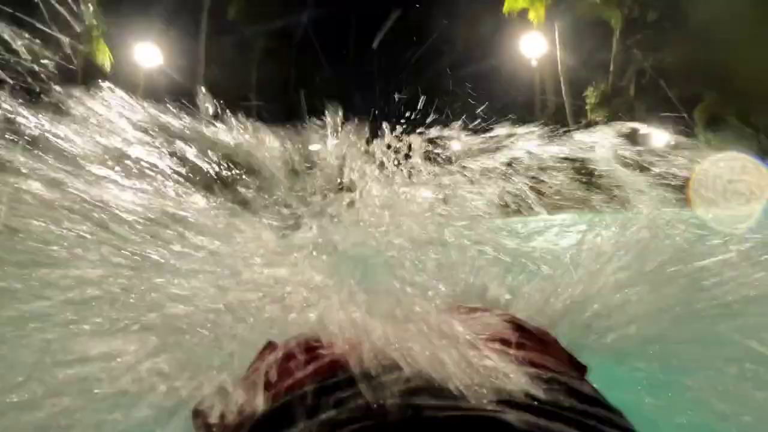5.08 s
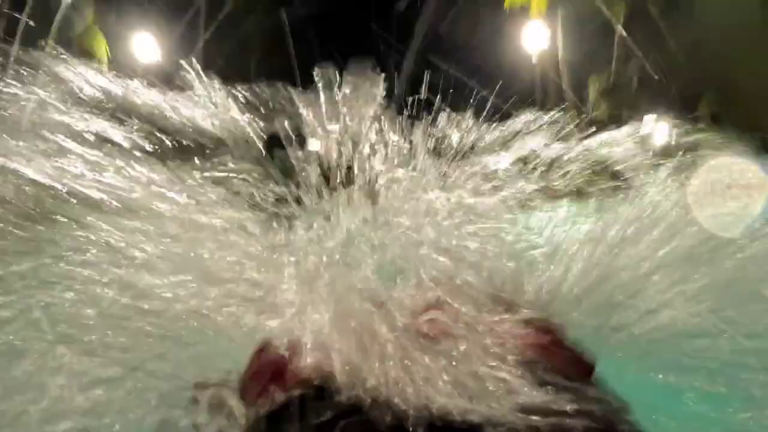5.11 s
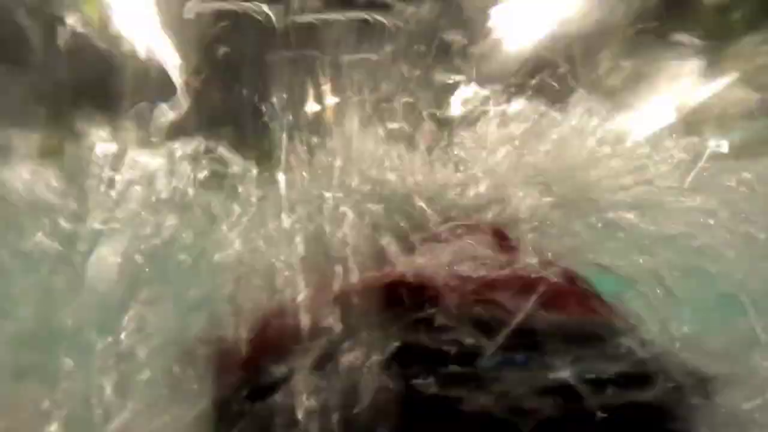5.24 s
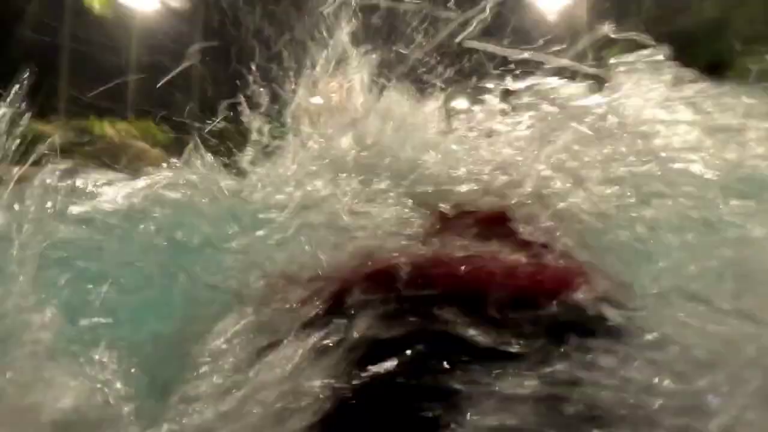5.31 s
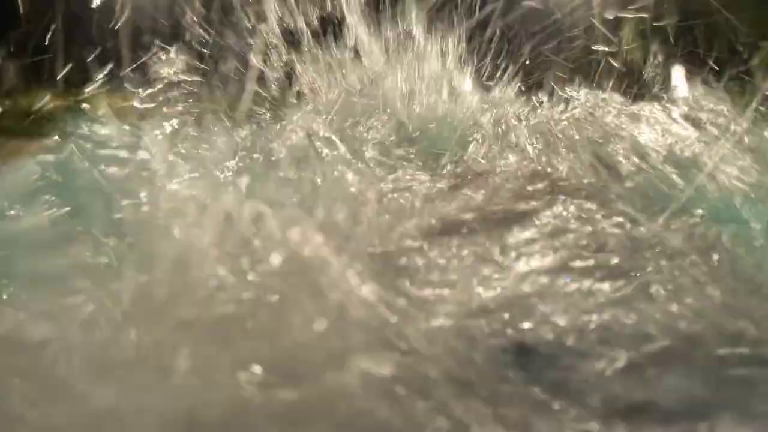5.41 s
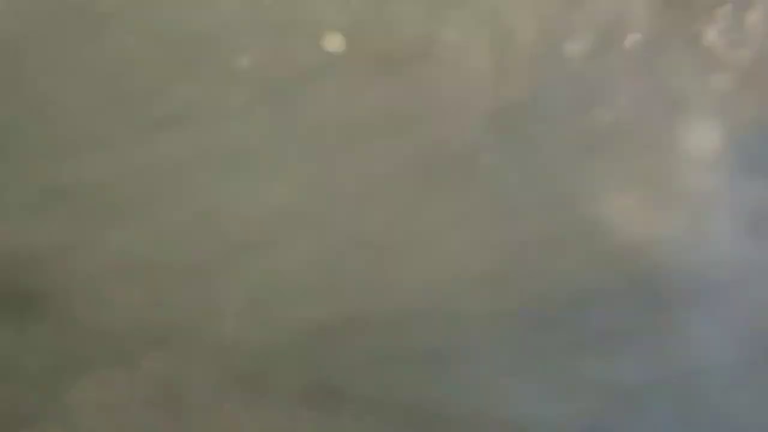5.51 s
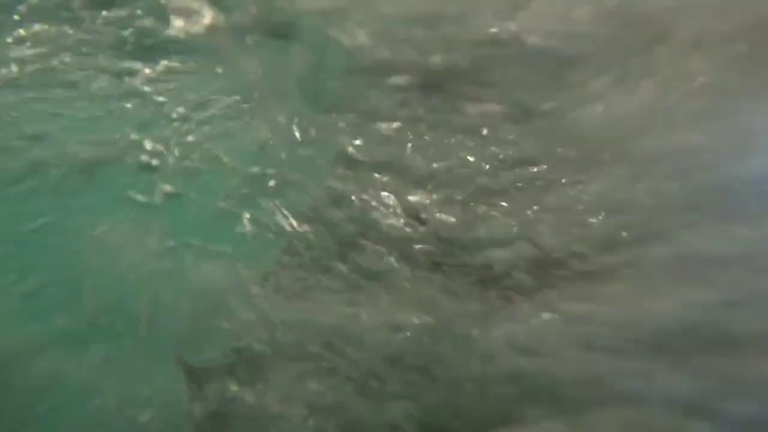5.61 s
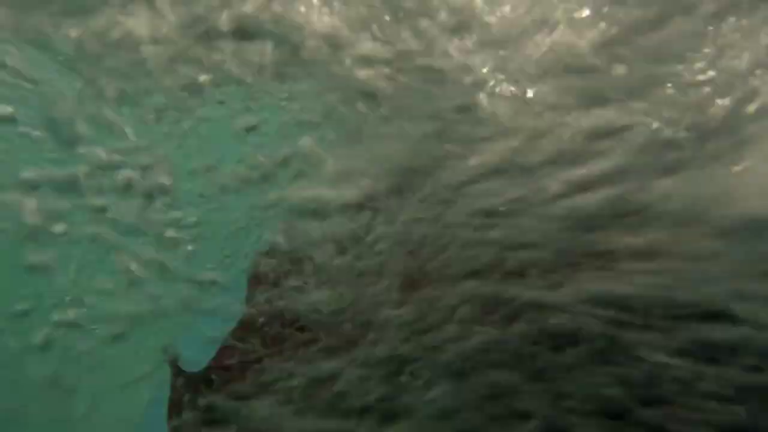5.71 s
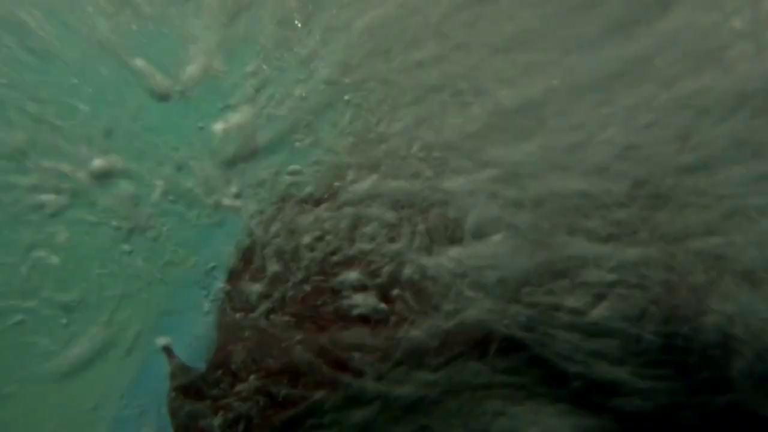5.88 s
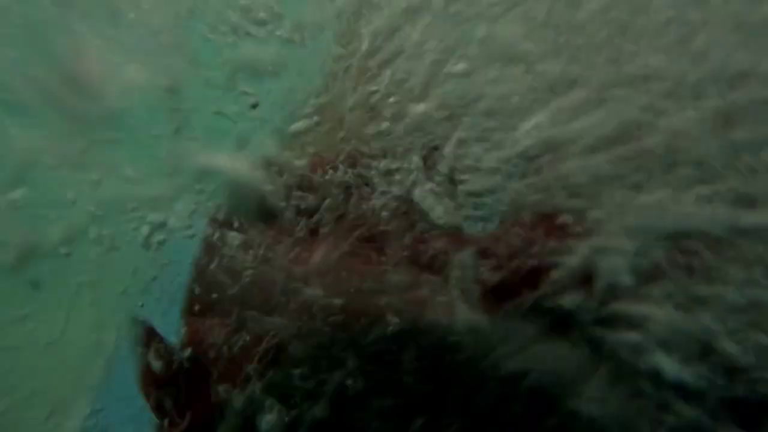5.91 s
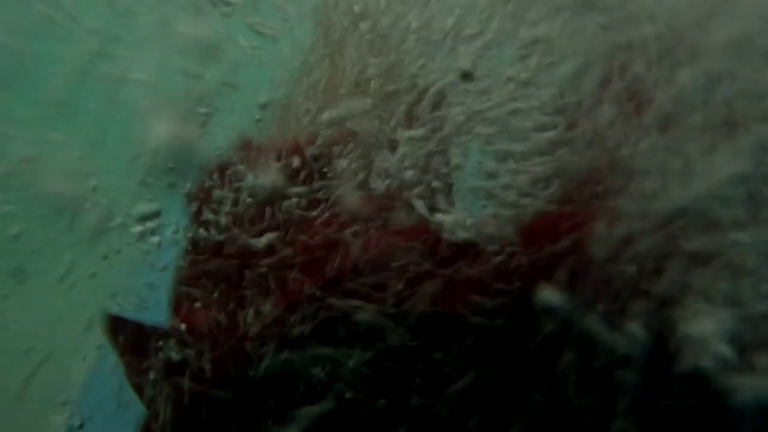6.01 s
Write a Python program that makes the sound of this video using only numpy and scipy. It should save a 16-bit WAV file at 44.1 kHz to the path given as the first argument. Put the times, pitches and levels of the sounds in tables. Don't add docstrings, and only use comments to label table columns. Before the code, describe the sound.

Heard from a camera riding along inside a dark water slide: deep uneven rumble and judder shake its housing, with hollow knocks and dull thuds at the tube joints and water hissing underneath. After about five seconds the water rushes up, spray slaps the housing hard and foam roars, overloading the microphone. Finally the treble vanishes as it sinks, leaving low wobbling bubbles.

```python
import sys
import numpy as np
from scipy import signal
from scipy.fft import rfft, irfft
from scipy.io import wavfile
from scipy.ndimage import uniform_filter1d

SR = 44100
rng = np.random.default_rng(int(sys.argv[2]) if len(sys.argv) > 2 else 0)


def convert_level_to_amplitude(level_db):
    exponent = np.asarray(level_db, float) / 20
    return 10 ** exponent


def waveform_to_disk(signal):
    frames = np.transpose(np.atleast_2d(signal))
    scaled = np.clip(frames, -1, 1) * 32767
    samples = np.round(scaled).astype(np.int16)
    wavfile.write(sys.argv[1], SR, samples)


N = 276507


def evened(x):
    return x / np.sqrt(np.mean(x ** 2) + 1e-20)


def smooth(x, span, axis=-1):
    return uniform_filter1d(uniform_filter1d(x, span, axis), span, axis)


def read(points, hz):
    f, value = np.transpose(points)
    return np.interp(np.log(hz + 1), np.log(f + 1), value)


def curve(rows, t):
    s, *columns = np.transpose(rows)
    return [np.interp(t, s, c) for c in columns]


def tents(rows, t):
    return np.array([np.maximum(1 - abs(t - row[0]) / row[1], 0) for row in rows])


def add(mix, s, sound, pan_db):
    part = mix[:, round(s * SR):][:, :len(sound)]
    part += convert_level_to_amplitude(np.array([[pan_db / 2], [-pan_db / 2]])) * sound[:part.shape[1]]


def band_noise(tone):
    hz = np.fft.rfftfreq(N, 1 / SR)
    return evened(irfft(rfft(rng.standard_normal(N)) * convert_level_to_amplitude(read(tone, hz)), N))


# (frequency [Hz], level [dB per Hz])
SHAKE_TONE = [(10, -3), (22, 6.5), (32, 1.5), (50, -9.5), (75, -37.5), (200, -89), (900, -140)]
JUDDER_TONE = [(30, -47.5), (55, 3), (90, -6.5), (130, -16), (220, -46), (800, -93.5), (3000, -140)]
SCRAPE_TONE = [(80, -29), (150, 3), (300, -4.5), (500, -9.5), (800, -12), (2000, -74), (6000, -130)]
# (time [s], half length [s], lift [dB])
SWAYS = [(0.119, 0.043, 9), (.55, 0.19, -2), (0.75, 0.1, 5.5), (0.916, 0.093, 7.5), (1.51, 0.34, 7.5),
         (1.837, 0.29, -6), (2.095, 0.071, 8.5), (2.276, 0.29, -2), (2.609, 0.14, 5.5), (2.939, 0.18, 1.5),
         (3.253, 0.087, 12.5), (3.406, 0.12, -9.5), (4.077, 0.28, 3.5), (4.61, 0.25, 9), (4.917, 0.15, 7),
         (5.168, 0.09, -5.5), (5.323, 0.14, 8.5), (5.647, 0.065, 3.5), (6.017, 0.2, -17), (6.27, 0.23, -21)]
# (time [s], half length [s], judder lift [dB], splash lift [dB])
RUBS = [(0.065, 0.24, 3, 2), (0.525, 0.045, 14.5, 3), (0.723, 0.17, 11.5, 9), (1.476, 0.21, 6, 2),
        (1.975, 0.089, 5.5, 3.5), (2.105, 0.11, 6, 0.5), (2.614, 0.22, 11.5, 3), (2.932, 0.082, 10.5, 2),
        (3.167, 0.2, 3.5, 4), (4.15, 0.28, 1, 0), (4.615, 0.34, 3.5, 1.5)]
# (time [s], drag [0-1])
DRAG = [
    (4.85, 0.47),
    (5.2, 0.4),
    (5.3, 0.89),
    (5.46, 0.79),
    (5.52, 0.77),
    (5.66, 0.96),
    (5.85, 0.95),
    (6.01, 0.79),
    (6.27, 0.4),
]
SHAKE_DB, JUDDER_DB, SCRAPE_DB = -24, -48.5, -65.5
JUDDER_DRAG_DB, SCRAPE_DRAG_DB = 23.5, 34
SCRAPE_PER_JUDDER, SCRAPE_PER_SPLASH = 0.49, 1


def tube():
    t = np.arange(N) / SR
    drag = curve(DRAG, t)[0]
    judder, splash = np.transpose(RUBS)[2:] @ tents(RUBS, t)
    shake_db = SHAKE_DB + np.transpose(SWAYS)[2] @ tents(SWAYS, t)
    judder_db = JUDDER_DB + judder + JUDDER_DRAG_DB * drag
    scrape_db = SCRAPE_DB + SCRAPE_PER_JUDDER * judder + SCRAPE_PER_SPLASH * splash
    scrape_db = scrape_db + SCRAPE_DRAG_DB * drag
    motion = np.zeros(N)
    for tone, level_db, span in ((SHAKE_TONE, shake_db, 5000), (JUDDER_TONE, judder_db, 2500),
                                 (SCRAPE_TONE, scrape_db, 2000)):
        x = band_noise(tone)
        x = evened(x / np.sqrt(smooth(x ** 2, span) + .05))
        motion += convert_level_to_amplitude(level_db) * x
    twist = convert_level_to_amplitude(-21.5) * band_noise(SHAKE_TONE) * convert_level_to_amplitude(shake_db)
    return motion + twist * np.array([[1], [-1]])


# (time [s], ring [dB], ring pitch [Hz], thump [dB], tick [dB])
KNOCKS = [(.127, -32, 580, -62, -34), (.131, -16, 515, -21.5, -24), (.503, -25.5, 637, -24, -24),
          (.526, -17.5, 610, -25.5, -54), (.565, -42, 404, -43, -60), (.628, -32.5, 746, -35, -45),
          (.691, -29, 432, -28, -31), (.81, -20.5, 560, -34, -40), (1.443, -29, 477, -33, -34),
          (1.568, -24, 482, -24.5, -27.5), (2.015, -21.5, 520, -34, -29.5), (2.109, -32, 467, -29.5, -32.5),
          (2.594, -32, 445, -30, -53), (2.641, -26.5, 423, -28, -28.5), (3.282, -26, 470, -25, -25),
          (4.38, -31.5, 450, -44, -41), (4.629, -28, 410, -20.5, -21.5), (4.639, -28, 521.7, -26, -61),
          (5.044, -52, 550, -26.5, -27), (5.242, -35, 395, -32.5, -35), (5.339, -31, 410, -22.5, -25),
          (5.389, -13, 534, -25, -19), (5.4303, -39, 590, -34, -18.5), (5.571, -17.5, 600, -27.5, -36),
          (5.789, -9.5, 480, -28, -32)]
# (time [s], thump [dB])
BUMPS = [(.395, -41.5), (0.59, -38), (0.67, -34), (0.765, -31), (0.977, -36), (1.099, -38), (1.629, -37),
         (1.719, -45), (1.903, -32), (1.935, -40), (1.947, -37), (1.963, -40), (2.028, -34), (2.076, -38),
         (2.168, -49), (2.318, -45), (2.449, -35.5), (2.489, -35.5), (2.513, -37), (2.663, -35),
         (2.683, -36), (2.929, -38.5), (3.334, -45), (3.542, -44), (4.347, -41), (5.3, -30), (4.682, -32.5),
         (4.758, -41), (4.853, -37.5), (4.674, -36), (4.869, -31.5), (5.174, -34.5)]
BUMP_HZ, BUMP_RING_DB, BUMP_TICK_DB = 450, -15, -7


def knocks():
    out, t = np.zeros((2, N)), np.arange(2500) / SR
    soften = signal.butter(8, 1950, fs=SR)
    rise = np.minimum(t / 0.003, 1)
    late = np.maximum(t - .0015, 0)
    blows = KNOCKS + [(s, db + BUMP_RING_DB, BUMP_HZ, db, db + BUMP_TICK_DB) for s, db in BUMPS]
    for (s, db, hz, thump_db, tick_db), (u, v) in zip(blows, rng.random((len(blows), 2))):
        tick = -np.cos(2 * np.pi * (1050 + 200 * v) * (t - .0012)) * np.exp(-((t - .0012) / 0.00047) ** 2)
        echo = .4 * np.sin(2 * np.pi * (900 + 700 * u) * t) * convert_level_to_amplitude(-60 * t / 0.02) * rise
        ring_cycles = 1.108 * hz * t * (1 - 12 * np.minimum(t, .015))
        ring = np.sin(2 * np.pi * ring_cycles) * convert_level_to_amplitude(-60 * t / 0.015) * rise
        thump_cycles = 112 * late + (410 + 60 * u) * 0.0029 * (1 - np.exp(-late / 0.0029))
        thump = -np.sin(2 * np.pi * thump_cycles) * convert_level_to_amplitude(-60 * late / 0.076)
        blow = convert_level_to_amplitude(tick_db + 9.0) * (tick + echo) + convert_level_to_amplitude(db + 12.0) * ring + convert_level_to_amplitude(thump_db + 4.0) * thump
        add(out, s, signal.lfilter(*soften, blow), 0)
    return out


# (time [s], peak [dB], pitch [Hz])
THUDS = [(0.584, -22.5, 170), (0.624, -21, 123), (0.685, -31, 126), (0.721, -25, 127), (1.094, -37, 127),
         (1.391, -24.5, 131.5), (1.446, -23, 127), (1.566, -26.5, 190.2), (1.719, -28.5, 129),
         (1.863, -36, 128), (1.937, -32, 125), (2.11, -24.5, 194), (2.443, -29, 126), (2.51, -24, 127),
         (2.639, -16.5, 135), (2.68, -24, 128), (2.922, -23, 128), (3.168, -30.5, 226), (3.28, -20.5, 195),
         (3.544, -25.5, 127), (3.773, -35, 126), (3.921, -38, 145), (4.135, -37, 127),
         (4.627, -18.5, 200.6), (4.672, -27, 125), (4.758, -27, 128), (5.2, -26.5, 127)]
THUD_RISE_S, THUD_T60_S, THUD_DB = .005, 0.076, 1.5


def thuds():
    out, t = np.zeros((2, N)), np.arange(4000) / SR
    rise = np.minimum(t / THUD_RISE_S, 1)
    for s, db, hz in THUDS:
        add(out, s, -convert_level_to_amplitude(db + THUD_DB - 60 * t / THUD_T60_S) * rise * np.sin(2 * np.pi * hz * t), 0)
    return out


def water(rows, bands, tone, same, lean, lead, patchy_db, flicker_db, grain_db, size):
    hop, hz = size // 4, np.fft.rfftfreq(size, 1 / SR)
    frames = N // hop + 5
    t = np.arange(frames) * hop / SR
    a, b, c, d, patches, drops = rng.standard_normal((frames, len(hz), 6)).T
    s, *levels = np.transpose(rows)
    colour = read(tone, hz)
    centres = [np.sqrt(lo * hi) for lo, hi in bands]
    field_db = colour[:, None] + 0 * t
    for k, (lo, hi) in enumerate(bands):
        inside = (hz > lo) & (hz <= hi)
        share_db = 10 * np.log10(np.sum(convert_level_to_amplitude(2 * colour)[inside]))
        weight = read(list(zip(centres, np.arange(len(bands)) == k)), hz)
        field_db += np.outer(weight, np.interp(t, s, levels[k]) - share_db)
    field_db += patchy_db * evened(uniform_filter1d(smooth_twice_free(patches, size // 64), 24, 1))
    field_db += flicker_db * evened(uniform_filter1d(smooth_twice_free(drops, size // 6), 3, 1))
    grains = evened(uniform_filter1d(smooth_twice_free(drops, 4), 3, 1))
    field_db += grain_db * np.maximum(grains - 1.5, 0)
    alike = np.clip(read(same, hz), 0, 1)[:, None]
    left = a + 1j * b
    right = alike * left + np.sqrt(1 - alike ** 2) * (c + 1j * d)
    right = right * np.exp(-1j * read(lead, hz))[:, None]
    tilt = convert_level_to_amplitude(read(lean, hz) / 2)[:, None]
    running = (t >= s[0]) & (t <= s[-1] + .015)
    z = np.array([left * tilt, right / tilt]) * convert_level_to_amplitude(field_db) * running
    return signal.istft(z, nperseg=size, noverlap=size - hop)[1][:, :N]


def smooth_twice_free(x, span):
    return uniform_filter1d(x, span, 0)


# (time [s], flow [dB])
FLOW = [(0, 1), (.05, 3.5), (.3, 1), (1.1, 1.3), (1.2, 4.5), (1.3, 1.5), (2.05, 1), (2.2, -2), (2.8, 1),
        (3.1, 0.3), (3.55, -2.5), (4.1, -0.1), (4.6, -0.5), (4.9, 3.5), (5.15, 12), (5.33, 15.5),
        (5.375, 20)]
# (calm [dB], per flow [dB/dB], per splash [dB/dB], wetting drift [dB/s])
RUSH_BANDS = [(-49.5, 0.79, 1.18, 0.63), (-51, 1.09, 0.48, -0.08), (-57, 1.19, 0.17, -0.32),
              (-76, 1.4, 0.34, -0.65)]
# (low edge [Hz], high edge [Hz])
RUSH_HZ = [(700, 2000), (2400, 5500), (5500, 8000), (8500, 12500)]
# (frequency [Hz], level [dB per Hz])
RUSH_TONE = [(150, -26.5), (400, -16), (930, -2), (1250, -6.5), (1580, -3.5), (1850, -2), (2000, -12.5),
             (2150, -10), (2380, -12.5), (2900, -3), (3500, -13), (4700, -10.5), (5800, -17), (6550, -15.5),
             (7200, -23), (10200, -39), (11200, -50), (12000, -46.5), (13200, -59)]
# (frequency [Hz], likeness [0-1])
RUSH_SAME = [(200, 0.43), (500, 0.2), (1000, 0.076), (1400, 0.86), (2150, 0.74), (3300, 0.51), (4800, 0.89),
             (7000, 0.98), (10600, 0.77)]
# (frequency [Hz], level [dB])
RUSH_LEAN = [(260, 9), (550, -4), (1150, 0.4), (2410, 6), (5050, -2), (10600, 1.7)]
# (frequency [Hz], phase [rad])
RUSH_LEAD = [(520, .5), (900, -.2), (1290, -6.3), (2000, -7.2), (3000, -7.3), (3600, -7.6), (4000, -6.1),
             (4600, -6.28)]


def rush_rows():
    t = np.arange(FLOW[0][0], FLOW[-1][0], .004)
    flow = curve(FLOW, t)[0]
    splash = np.transpose(RUBS)[3] @ tents(RUBS, t)
    return np.transpose([t] + [db + a * flow + b * splash + c * t for db, a, b, c in RUSH_BANDS])


def rush():
    return convert_level_to_amplitude(2.0) * water(rush_rows(), RUSH_HZ, RUSH_TONE, RUSH_SAME, RUSH_LEAN, RUSH_LEAD,
                            patchy_db=1.12, flicker_db=1.1, grain_db=2.3, size=512)


# (time [s], churn [dB], depth [0-1])
PLUNGE = [
    (5.399, 1, 0.8),
    (5.412, -17, 0.1),
    (5.46, -9, 0.14),
    (5.53, -5.5, 0),
    (5.61, 1.2, 0.07),
    (5.8, 3.5, 0.44),
    (6., 1, 0.61),
    (6.26, -4, 0.96),
]
# (time [s], half length [s], lift [dB], centre [Hz])
WAVES = [(5.491, 0.021, 13.5, 600), (5.588, 0.018, 8, 770), (5.689, 0.028, 9.5, 880),
         (5.714, 0.042, -9, 3500), (5.753, 0.066, 6.5, 2500), (5.792, 0.019, 10, 470),
         (5.958, 0.16, 4.5, 280), (6.08, 0.046, 0.5, 1300), (6.142, 0.032, 8.5, 210),
         (6.108, 0.037, 7, 3900), (5.45, 0.056, 11.5, 12000), (5.6, .02, 4.5, 2700),
         (5.525, 0.012, -5, 6600), (5.66, 0.01, -4, 1700), (5, 0.034, 5, 1500), (5.851, 0.0098, 0, 340),
         (5.9, .04, 5, 560), (5.68, 0.036, 5, 6000)]
WAVE_OCTAVES = 1.35
# (full churn [dB], per churn [dB/dB], at full depth [dB])
FOAM_BANDS = [(-29, 0.5, 14.5), (-27, 1.07, -1), (-18, 1.4, -28), (-30.5, 1.7, -46)]
# (low edge [Hz], high edge [Hz])
FOAM_HZ = [(190, 700), (700, 2200), (2200, 5500), (5500, 11000)]
# (frequency [Hz], level [dB per Hz])
FOAM_TONE = [(120, -45), (200, -6), (600, -1.5), (1570, 4), (2060, -6), (2900, -9.5), (3500, -17.5),
             (4800, -16.5), (6500, -17.5), (8500, -27), (10500, -37), (12500, -39), (15000, -75.5),
             (22000, -120)]
# (frequency [Hz], likeness [0-1])
FOAM_SAME = [(170, 1), (340, 1), (650, 0.75), (1340, 0.83), (3300, 0.45), (7000, 0.84), (10600, 0.5),
             (13000, 0.4)]
# (frequency [Hz], level [dB])
FOAM_LEAN = [(60, 5), (170, 1), (470, 0), (1340, 0), (3000, 5.5), (5000, -1.5)]
# (frequency [Hz], phase [rad])
FOAM_LEAD = [(100, 0.071), (2840, -0.071), (4130, 0.16)]
SPATTER_S, SPATTER_DB = 0.0026, 2.5


def foam_rows():
    t = np.arange(PLUNGE[0][0], PLUNGE[-1][0], .004)
    churn, depth = curve(PLUNGE, t)
    _, _, lift_db, wave_hz = np.transpose(WAVES)
    waves = tents(WAVES, t)
    rows = [t]
    for (db, a, b), (lo, hi) in zip(FOAM_BANDS, FOAM_HZ):
        near = np.exp(-(np.log2(np.sqrt(lo * hi) / wave_hz) / WAVE_OCTAVES) ** 2)
        rows.append(db + a * churn + b * depth + (lift_db * near) @ waves)
    return np.transpose(rows)


def spatter():
    handfuls = evened(smooth(rng.standard_normal(N), round(SPATTER_S * SR)))
    return evened(convert_level_to_amplitude(SPATTER_DB * np.clip(handfuls, -3, 2.5)))


def foam():
    roar = water(foam_rows(), FOAM_HZ, FOAM_TONE, FOAM_SAME, FOAM_LEAN, FOAM_LEAD,
                 patchy_db=3.12, flicker_db=2.55, grain_db=1.0, size=512)
    return convert_level_to_amplitude(-3.2) * roar * spatter()


# (time [s], peak [dB], centre [Hz], wide crack [dB])
SLAPS = [(0.13, -22, 2040, -48), (.133, -24, 3410, -54), (0.544, -29, 2950, -59), (5.3897, -12, 6300, -5),
         (5.3993, -21, 1480, -33), (5.473, -31, 2770, -42), (5.48, -16.5, 2960, -42),
         (5.494, -11, 2900, -20), (5.506, -11.5, 2740, -30), (5.5115, -13, 2680, -26.5),
         (5.5223, -4, 1310, -38), (5.5584, -8, 3010, -43), (5.5686, -13, 1710, -41),
         (5.5896, -7, 1520, -39), (5.598, -3.5, 1527, -39), (5.604, -14, 3040, -43),
         (5.613, -12, 1540, -43), (5.641, -9, 2880, -38), (5.663, -14, 1560, -39), (5.671, -18, 1060, -43),
         (5.671, -12, 2850, -37.5), (5.6944, -8, 1220, -34.5), (5.707, -11, 1700, -43),
         (5.721, -15, 2170, -45), (5.738, -11, 1840, -43), (5.7463, -18, 1650, -40),
         (5.775, -20, 2900, -44), (5.798, -8, 1530, -34), (5.81, -27, 2870, -36), (5.838, -6, 1500, -39),
         (5.8633, -18, 960, -35.5), (5.905, -31, 2600, -50), (5.9216, -8, 990, -48),
         (5.931, -15, 2060, -53), (5.939, -16.5, 3430, -42), (5.946, -21, 940, -46),
         (5.977, -21, 1100, -55), (5.998, -12, 1780, -55), (6.0158, -8.5, 1800, -45),
         (6.029, -10.5, 3120, -52), (6.081, -13, 1810, -58), (6.1, -25, 2870, -60),
         (6.118, -20.5, 3100, -57), (6.138, -17, 1650, -68), (6.1418, -14.5, 2800, -68),
         (6.1703, -17, 950, -70), (6.191, -22, 1560, -70), (6.203, -18, 2040, -75), (6.222, -32, 2910, -57),
         (6.239, -34, 3400, -70), (6.2552, -28, 2550, -67)]
# (time [s], peak [dB], centre [Hz])
DROPS = [(.026, -32, 2885), (.047, -29, 1750), (.062, -33, 1820), (5.401, -33, 5230), (5.4198, -33, 5200),
         (5.435, -25, 4600), (5.4535, -29, 5000), (5.4574, -30, 6500), (5.473, -20, 4690),
         (5.494, -18.5, 7100), (5.499, -8, 4560), (5.508, -18, 6100), (5.514, -22.5, 6200),
         (5.535, -19, 5500), (5.537, -16.5, 4660), (5.538, -19, 7300), (5.5438, -19.5, 5860),
         (5.554, -20, 4900), (5.5674, -15, 4800), (5.587, -22, 4640), (5.6196, -12.5, 5800),
         (5.634, -9, 3900), (5.6428, -17, 6180), (5.647, -16.5, 4320), (5.6662, -18, 5770),
         (5.669, -22, 7200), (5.7161, -18.5, 5170), (5.746, -20, 4200), (5.7627, -13.5, 4200),
         (5.7742, -20, 7500), (5.787, -22, 4260), (5.8004, -23, 6530), (5.81, -20, 4900),
         (5.822, -32, 5600), (5.8418, -25, 4380), (5.853, -35, 8260), (5.8894, -20, 5000),
         (5.9283, -34, 5000), (5.947, -32, 6300), (5.9635, -35, 5320), (5.983, -34, 4300),
         (6.002, -31, 6560), (6.0105, -24, 4670), (6.0267, -15, 3670), (6.0437, -32, 6900),
         (6.077, -29, 5250), (6.1, -40, 4600), (6.1212, -24, 4000), (6.1731, -48, 4400),
         (6.1965, -54, 5000), (6.218, -43, 5550), (6.245, -46, 5400), (5.905, -42, 10400),
         (5.927, -36, 7000), (5.959, -38, 8500), (5.964, -36, 7000), (6.102, -44, 7500), (6.127, -42, 6000),
         (6.209, -50, 7500), (6.222, -53, 9250)]
# (time [s], pan to left [dB])
SPRAY_SIDE = [
    (5.39, 8),
    (5.515, 10.5),
    (5.57, 8.5),
    (6.27, -2),
]
# (frequency [Hz], level [dB])
CRACK_TONE = [(300, -2), (2500, 2.5), (3700, -15), (4600, 6.5), (5700, -3.5), (6500, 3.5), (9800, -6.0),
              (11700, -30), (13000, -33), (16000, -54), (20000, -79)]
SLAP_T60_S, DROP_T60_S, CRACK_T60_S = 0.019, 0.017, 0.0099
DROP_CRACK_DB, CRACK_SINK_DB = -20.5, -7


def slaps():
    out, t = np.zeros((2, N)), np.arange(2000) / SR
    f = np.fft.rfftfreq(len(t), 1 / SR)
    crack_gain = convert_level_to_amplitude(read(CRACK_TONE, f))
    body_rise = np.sin(np.pi / 2 * np.minimum(t / 0.0013, 1)) ** 2
    crack_rise = np.minimum(t / 0.00056, 1)
    strikes = []
    for s, db, hz, crack_db in SLAPS:
        pan_db = curve(SPRAY_SIDE, s)[0] if hz < 4000 else -.8
        strikes.append((s, db, hz, SLAP_T60_S, crack_db, pan_db))
    for s, db, hz in DROPS:
        crack_db = db + DROP_CRACK_DB + CRACK_SINK_DB * curve(PLUNGE, s)[1]
        strikes.append((s, db, hz, DROP_T60_S, crack_db, -.8))
    noises = rng.standard_normal((len(strikes), len(t)))
    for (s, db, hz, t60, crack_db, pan_db), noise in zip(strikes, noises):
        burst = evened(irfft(rfft(noise) * convert_level_to_amplitude(-40 * abs(np.log2((f + 1) / hz)))))
        crack = evened(irfft(rfft(noise[::-1]) * crack_gain))
        body = 0.38 * burst + 0.7 * np.sin(2 * np.pi * hz * t)
        body = convert_level_to_amplitude(db) * body * convert_level_to_amplitude(-60 * t / t60) * body_rise
        crack = convert_level_to_amplitude(crack_db + 3.5 - 60 * t / CRACK_T60_S) * crack_rise * crack
        add(out, s, body + crack, pan_db)
    return out


# (time [s], peak [dB], pitch [Hz])
SURGES = [(.123, -11, 35), (0.711, -9.5, 40), (5.309, -30, 60), (5.392, -13, 109), (5.435, -10, 99),
          (5.476, -13.5, 102), (5.483, -8.5, 151), (5.556, -18, 50), (5.609, -10, 140), (5.614, -8.5, 140),
          (5.639, -9, 112), (5.653, -10.5, 65), (5.722, -9, 60.3), (5.745, -9, 90), (5.775, -21, 90),
          (5.794, -9.5, 74.4), (5.839, -9, 80), (5.8638, -8, 320), (6.253, -14, 210)]
# (time [s], peak [dB], pitch [Hz])
PULLS = [
    (.695, -18.5, 95),
    (0.728, -16.5, 89),
    (.77, -18, 80),
    (5.572, -12, 150),
    (5.648, -10.5, 90),
    (5.662, -9, 70),
    (5.739, -13, 100),
    (5.848, -16, 80),
    (6.177, -18, 55),
]


def surges():
    out, t = np.zeros((2, N)), np.arange(-1500, 1500) / SR
    for s, db, hz, way in [row + (1,) for row in SURGES] + [row + (-1,) for row in PULLS]:
        push = np.cos(2 * np.pi * hz * t) * np.exp(-(3.7 * hz * t) ** 2)
        add(out, s + t[0], way * convert_level_to_amplitude(db) * push, 0.69 * way)
    return out


# (time [s], peak [dB], pitch [Hz])
POCKETS = [(5.86, -12, 253.4), (5.905, -16.5, 403), (5.913, -16, 274), (5.935, -14, 355), (5.94, -15, 267),
           (5.984, -5, 238.7), (5.995, -12.5, 479), (6.019, -6, 242.2), (6.066, -13, 249),
           (6.1, -14.5, 210), (6.13, -15, 562), (6.142, -6, 263.3), (6.159, -3, 267.6), (6.168, -20.5, 509),
           (6.179, -7.5, 269.5), (6.209, -16, 315), (6.222, -20, 699), (6.243, -18.5, 690),
           (6.149, -10, 54.4), (6.185, -15, 55.7), (6.238, -13, 80), (5.885, -21, 900), (5.903, -20, 756),
           (6.172, -18, 346)]


def pockets():
    out, t = np.zeros((2, N)), np.arange(6000) / SR
    rise = np.minimum(t / 0.007, 1)
    for s, db, hz in POCKETS:
        ring = np.sin(2 * np.pi * hz * t * (1 + 0.56 * t))
        pan_db = hz / 400 * np.cos(hz)
        add(out, s, convert_level_to_amplitude(db - 1.5 - 60 * t / 0.18) * rise * ring, pan_db)
    return out


SHELL_HZ = [560, 950, 1550, 2900, 3400, 4000, 4700, 5400, 6500, 7700]
BUBBLES_PER_S, BUBBLE_DB = 1100, -5


def bubbles():
    out, (s, *levels) = np.zeros((2, N)), np.transpose(foam_rows())
    centres = [np.sqrt(lo * hi) for lo, hi in FOAM_HZ]
    t = np.arange(900) / SR
    fade = np.cos(np.pi * t / t[-1] / 2)
    for when, mode, pitch, size, side in rng.random((BUBBLES_PER_S, 5)):
        at = N / SR - when
        hz = SHELL_HZ[int(mode * len(SHELL_HZ))] * (1 + .4 * (pitch - .5))
        foam_db = [np.interp(at, s, c, -99) for c in levels]
        db = read(list(zip(centres, foam_db)), hz) + BUBBLE_DB - 4.9 * np.log(size + 0.096)
        cycles = hz * t
        ring = np.sin(2 * np.pi * cycles * (1 + 0.0058 * cycles)) * np.exp(-cycles / 4.9)
        ring = ring * np.sin(np.pi / 2 * np.minimum(cycles / 3.1, 1))
        add(out, at, convert_level_to_amplitude(db) * ring * fade, 5.5 * np.log2(hz / 300) * (side - .4))
    return out


def scene():
    start = convert_level_to_amplitude(-18.0 - np.arange(N) / SR / 0.00099)
    ride = tube() + knocks() + thuds() + rush()
    plunge = foam() + slaps() + surges() + pockets() + bubbles()
    return start + ride + plunge


def top_cut(x):
    return signal.sosfilt(signal.butter(12, 15380, fs=SR, output="sos"), x)


def record(dry):
    stop = np.minimum(np.arange(N)[::-1] / 20, 1)
    mix = np.clip(dry, -1, 1) * stop
    return top_cut(mix)


dry = scene()
out = record(dry)
waveform_to_disk(out)
```